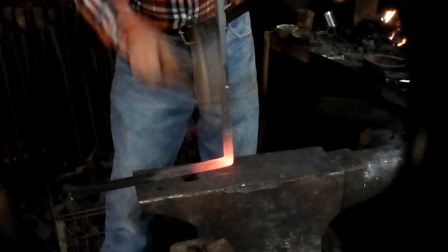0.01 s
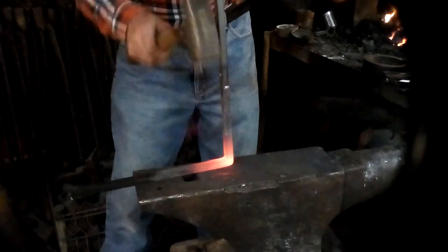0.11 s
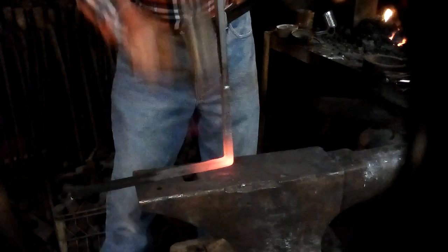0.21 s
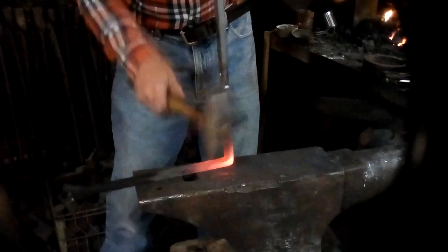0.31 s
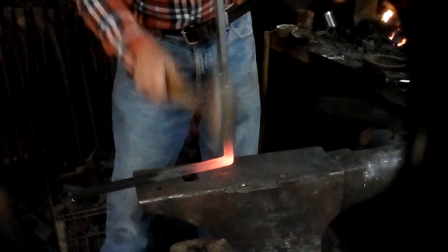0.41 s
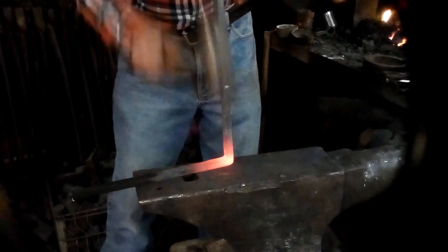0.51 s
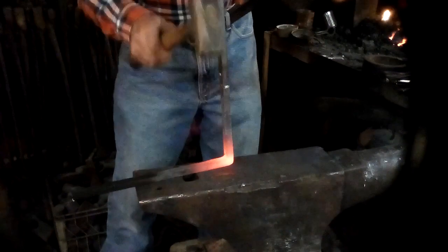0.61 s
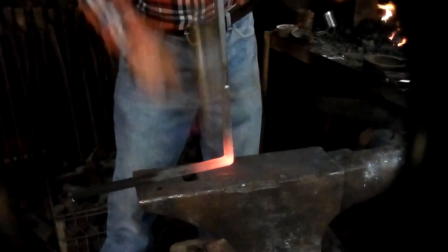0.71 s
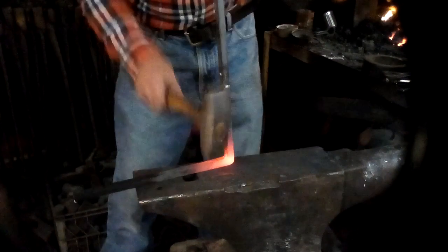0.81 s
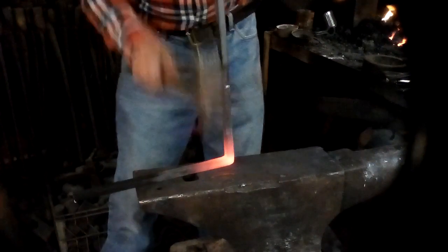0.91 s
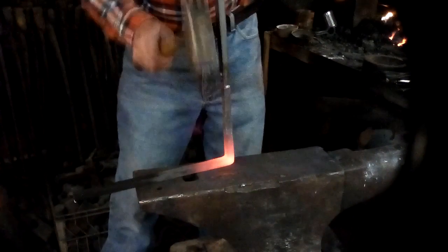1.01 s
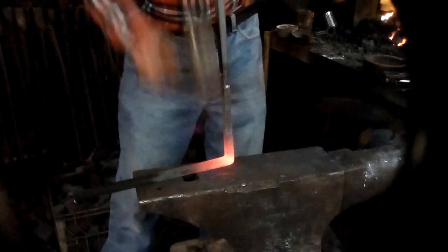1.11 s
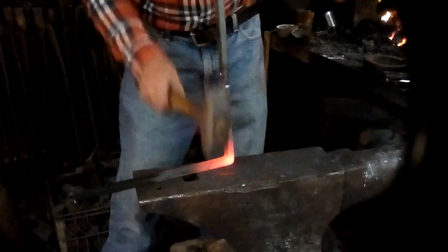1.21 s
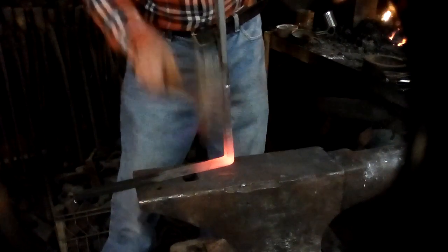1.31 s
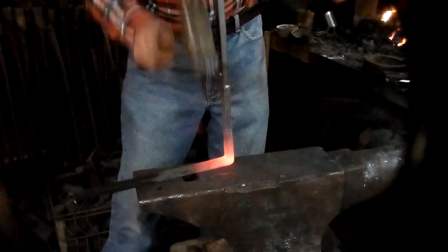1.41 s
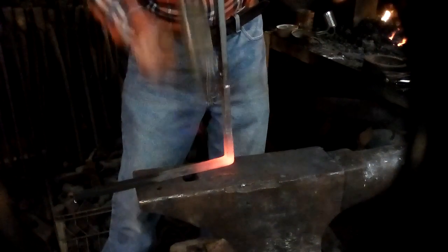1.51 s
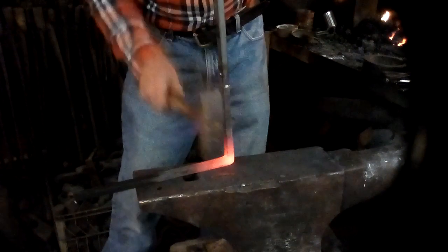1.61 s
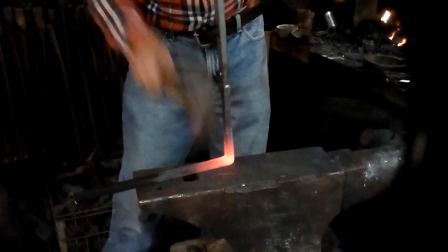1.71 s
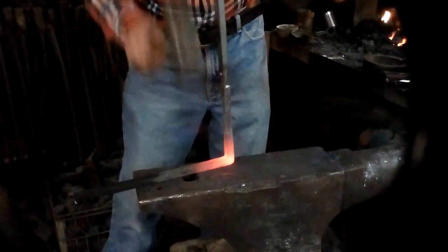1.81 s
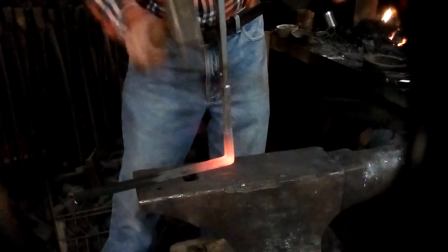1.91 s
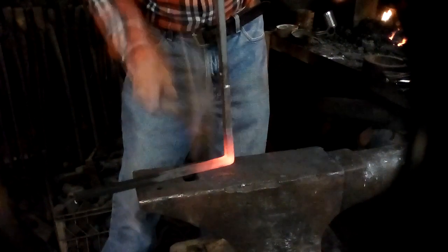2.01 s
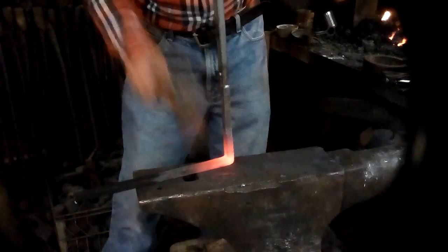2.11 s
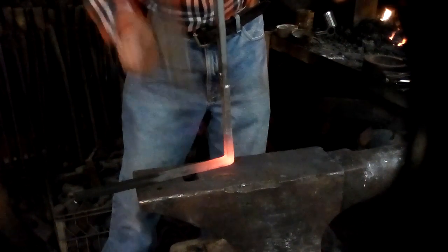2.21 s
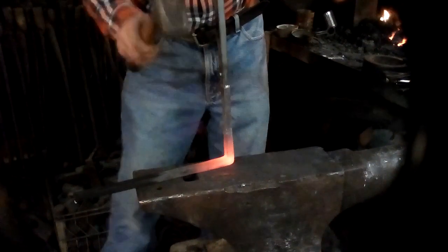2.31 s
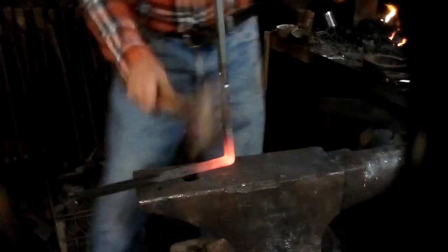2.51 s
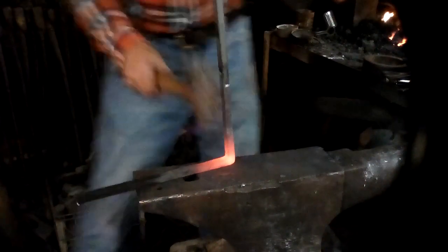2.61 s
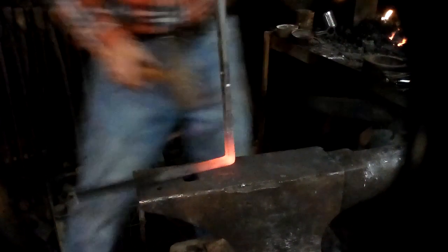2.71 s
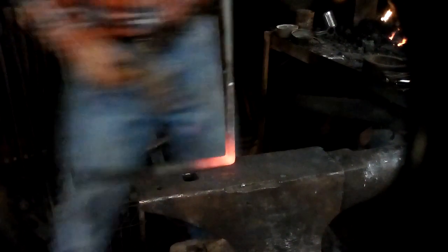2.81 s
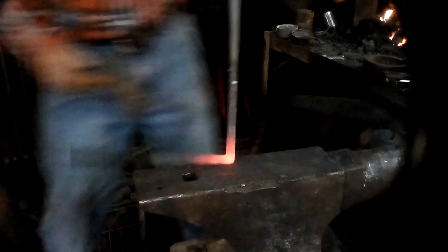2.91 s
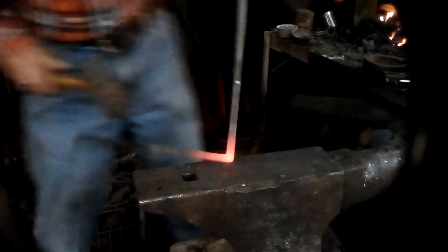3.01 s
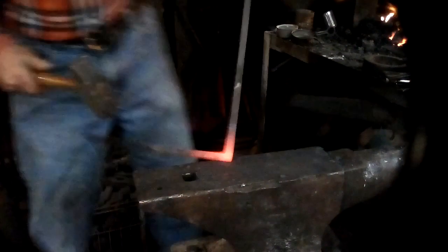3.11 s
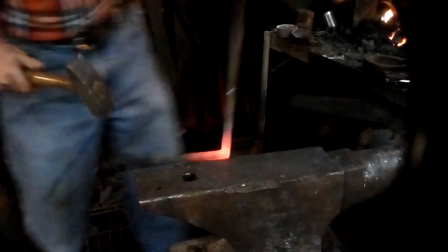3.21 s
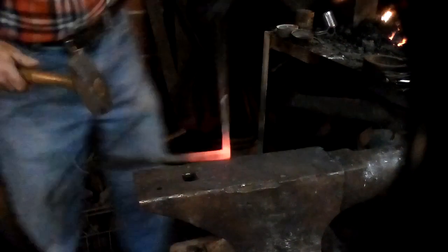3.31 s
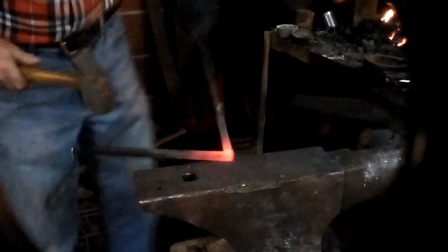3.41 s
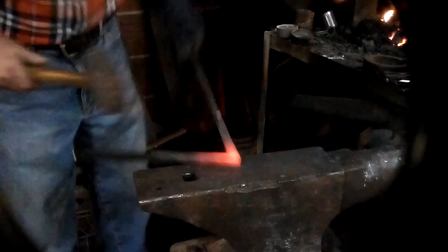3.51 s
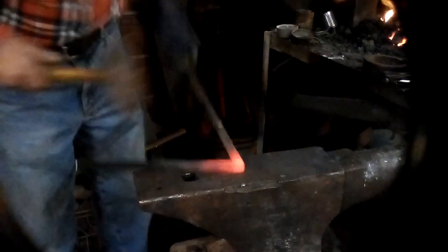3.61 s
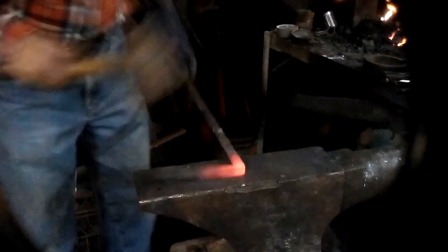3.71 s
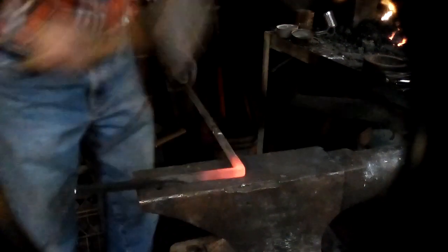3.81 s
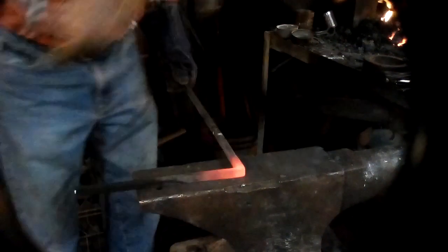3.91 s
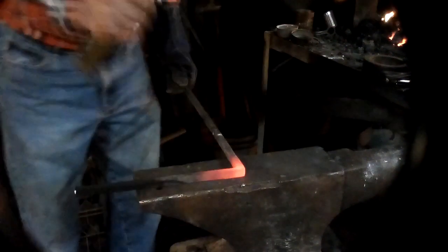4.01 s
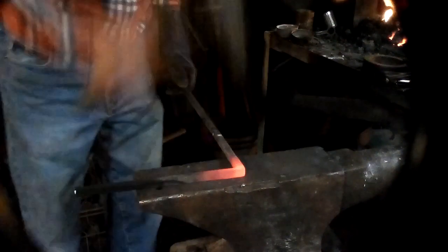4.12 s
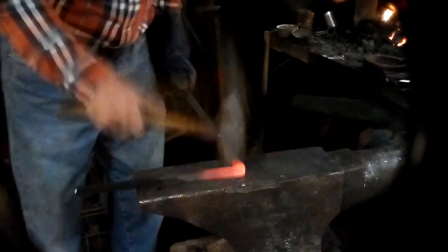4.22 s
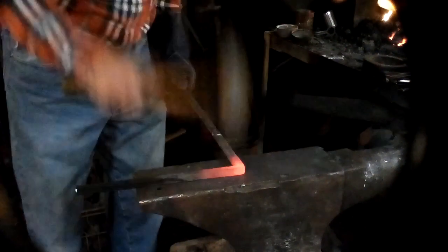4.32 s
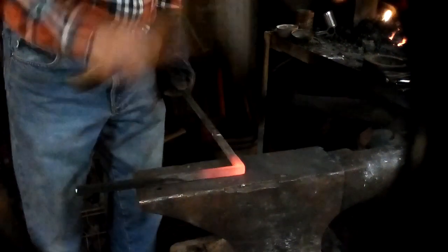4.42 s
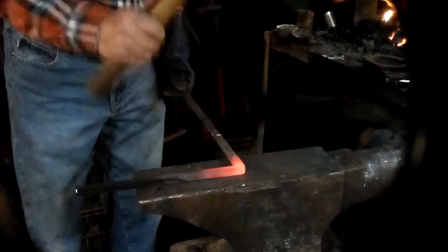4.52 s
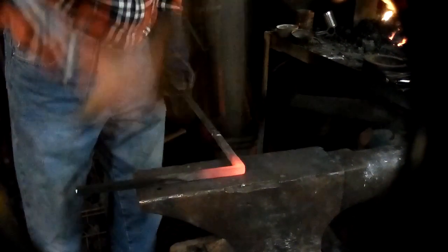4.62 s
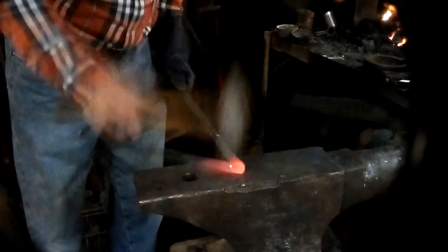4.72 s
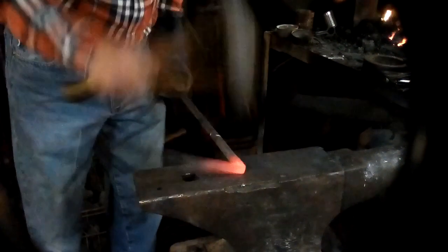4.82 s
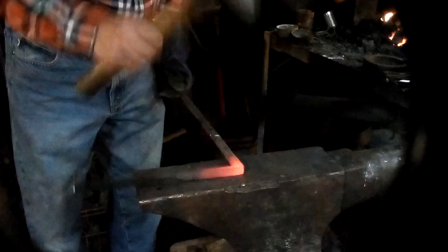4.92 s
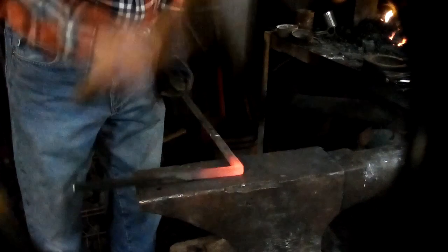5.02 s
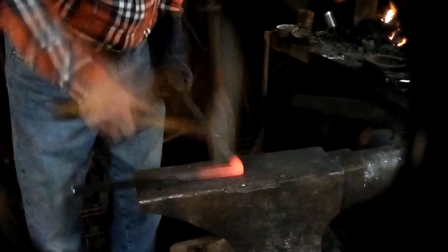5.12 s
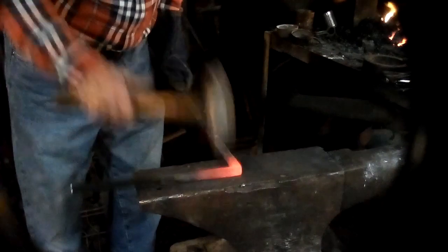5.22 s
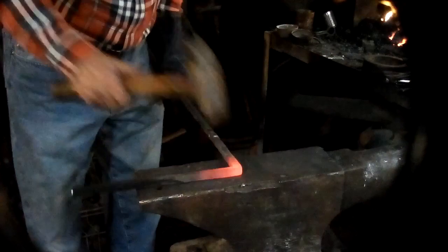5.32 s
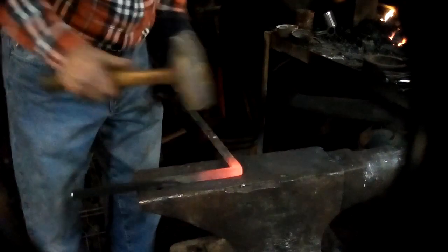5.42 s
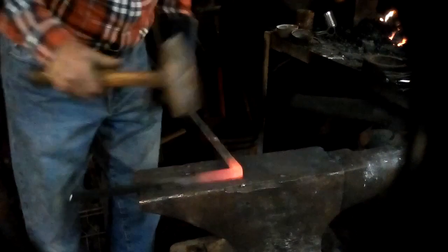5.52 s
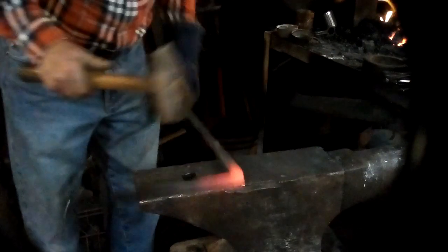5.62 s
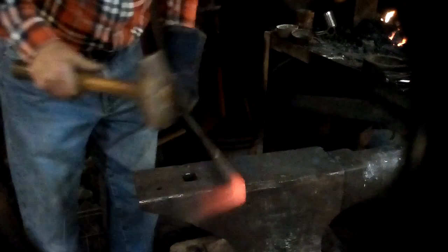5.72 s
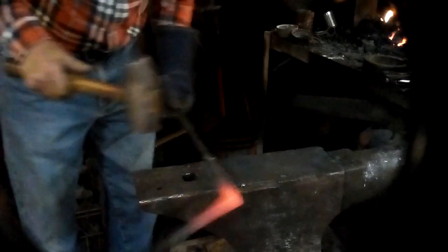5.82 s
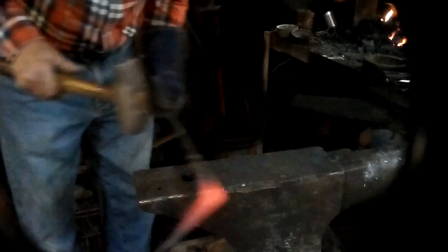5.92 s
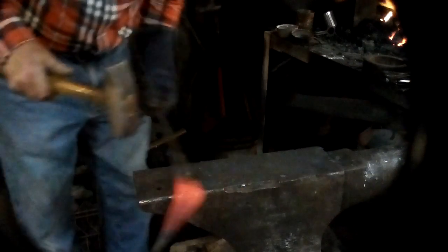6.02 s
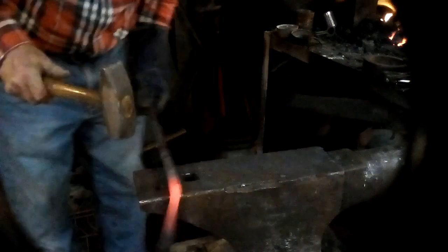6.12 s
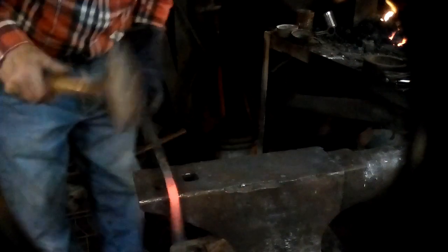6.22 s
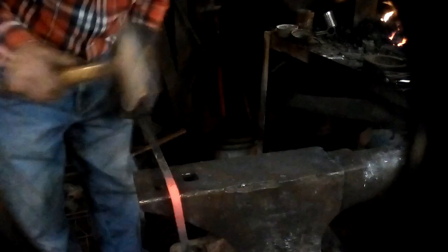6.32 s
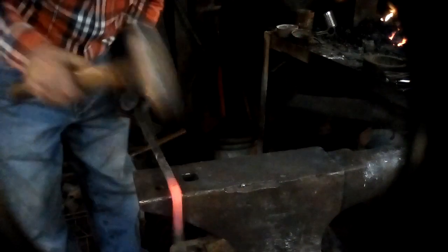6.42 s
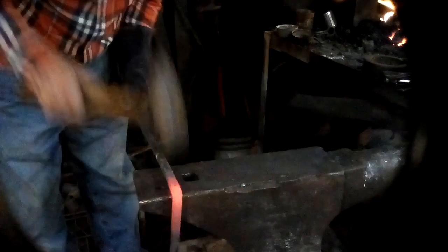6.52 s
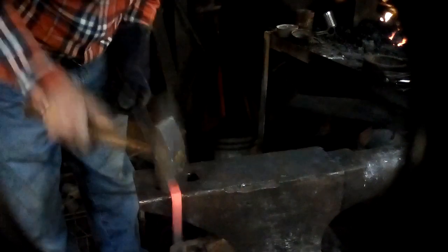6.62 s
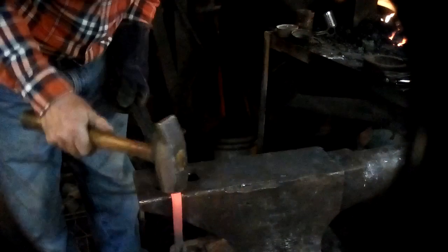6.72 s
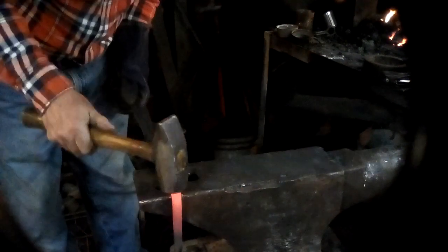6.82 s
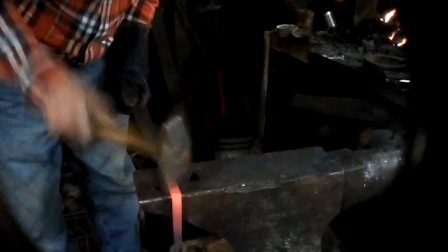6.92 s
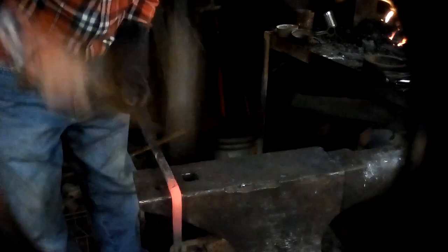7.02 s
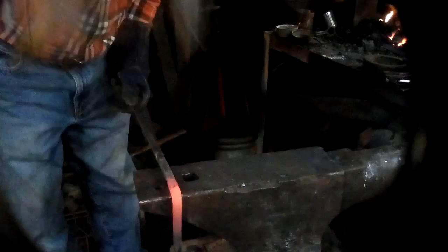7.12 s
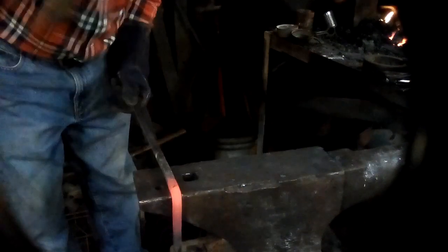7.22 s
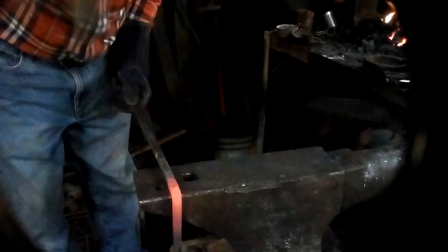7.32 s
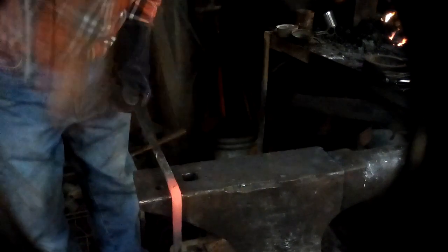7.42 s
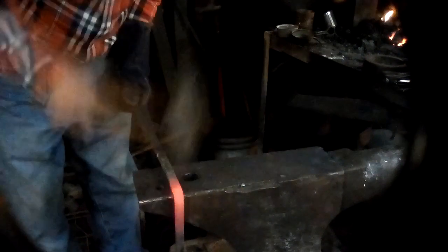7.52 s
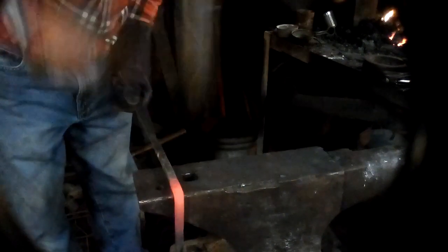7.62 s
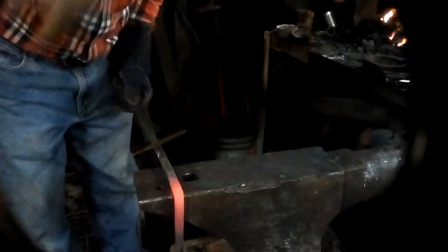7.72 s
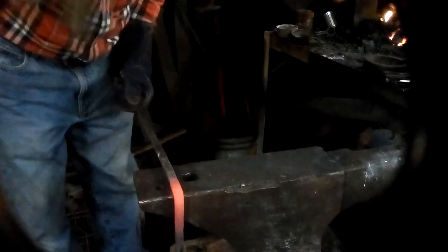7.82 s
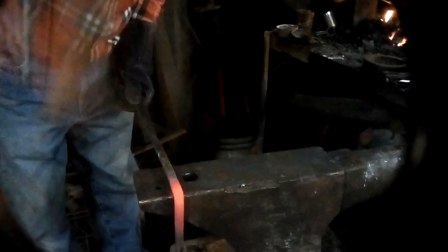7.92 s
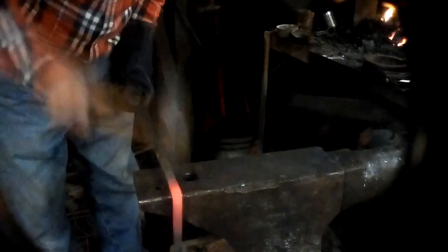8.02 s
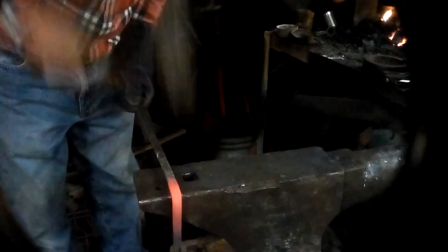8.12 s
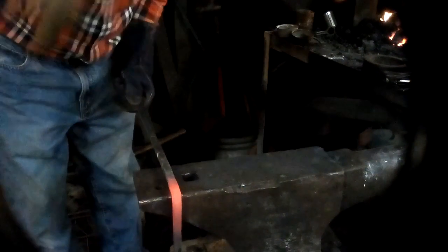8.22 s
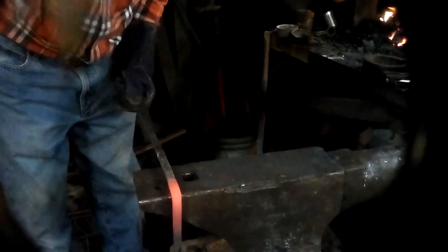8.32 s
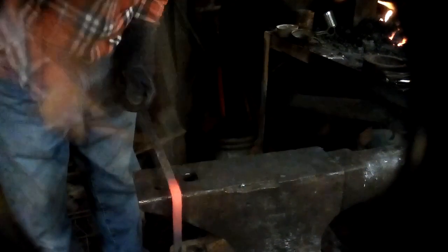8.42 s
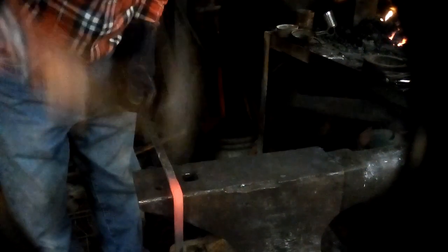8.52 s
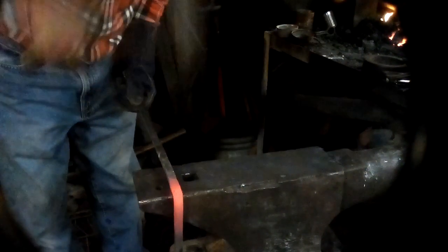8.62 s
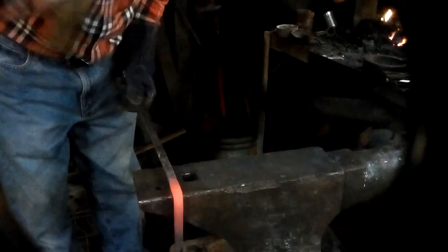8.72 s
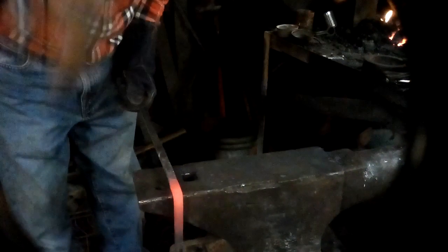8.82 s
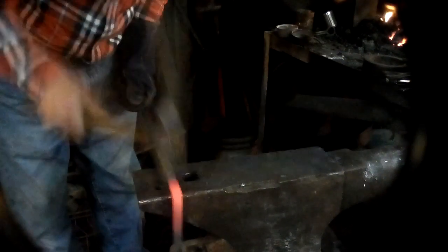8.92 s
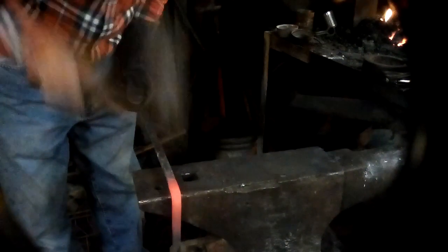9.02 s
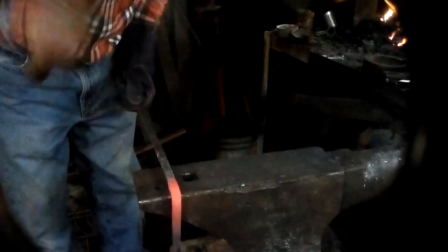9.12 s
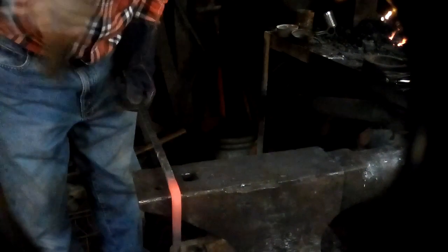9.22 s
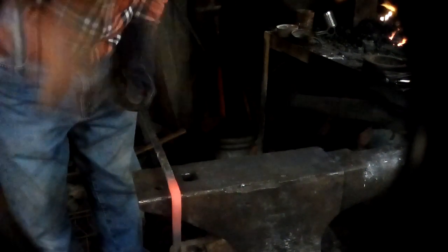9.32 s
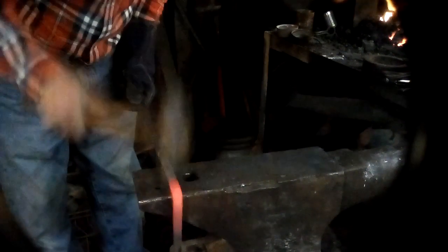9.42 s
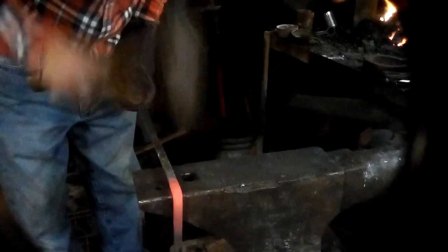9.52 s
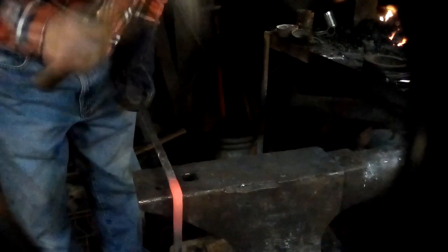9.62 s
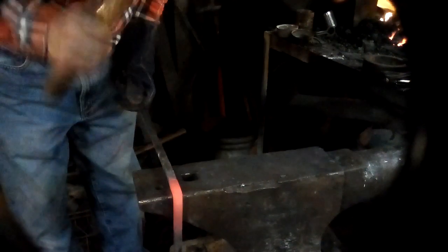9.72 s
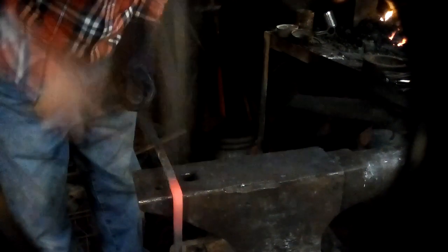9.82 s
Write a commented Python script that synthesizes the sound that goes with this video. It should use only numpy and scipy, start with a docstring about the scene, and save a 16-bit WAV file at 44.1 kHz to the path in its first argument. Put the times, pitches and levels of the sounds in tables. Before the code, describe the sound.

A hand hammer strikes a steel bar on an anvil in a hard-walled forge, over the faint, steady rumble and hiss of a fire. From 0.4 to 2.6 seconds come six evenly spaced blows, each a bright clang with a short ring and low thud, with a few light taps among them. Boots shift softly just after 3 seconds, then the bar scrapes briefly and knocks down at about 3.8. Three more ringing blows fall at 4.3, 4.8 and 5.2. Another short scrape and a footstep follow near 5.7, a few small knocks around 6.1 as the bar is turned, and one lighter blow at 6.7. From 7.6 to 9.5 seconds, five heavy blows land about half a second apart, each followed by a small, dull, ringing rebound. The room's echo swells briefly behind every strike, and the heaviest ones distort slightly.

```python
"""Over the low rumble of a fire, a smith strikes a glowing bar on an anvil: six blows into its bent corner.
Boots shift, the bar is dragged, and three blows fall on its flat. It is turned over with a few knocks and
takes a lighter blow on its edge. Last come five heavy blows on its end, each followed by a small rebound.
Every impact excites the modes of anvil and bar, which clang into a hard-walled forge. A limiter ducks
each blow, so that the room swells up behind it; the heaviest blows overload."""
import sys
import numpy as np
from scipy import signal
from scipy.fft import rfft, irfft, next_fast_len
from scipy.io import wavfile
from scipy.ndimage import uniform_filter1d, minimum_filter1d

SR = 44100
rng = np.random.default_rng(int(sys.argv[2]) if len(sys.argv) > 2 else 0)


def store_pcm(level_fs):
    """Save levels as 16-bit WAV."""
    pcm = np.round(np.clip(level_fs, -1, 1) * 32767).astype(np.int16)
    wavfile.write(sys.argv[1], SR, np.atleast_2d(pcm).T)


N = 434385
T = np.arange(SR) / SR  # one second, the life of a blow

# Modes of the anvil. Each row: frequency in Hz, t60 in seconds, then energy in dB with the bar
# on its corner, flat, edge and end.
ANVIL_MODES = [(1335, 0.07, -24, -25, -27, -35), (1690, 0.07, -28, -27, -21, -25),
               (1938, 0.07, -24, -29, -21, -23), (2110, 0.07, -25, -27, -22, -31),
               (2369, 0.07, -22, -26, -24, -17), (2627, 0.07, -26, -28, -22, -16),
               (2907, 0.09, -16, -22, -16, -20), (3424, 0.09, -19, -24, -18, -17),
               (3628, 0.09, -23, -23, -19, -24), (3758, 0.09, -23, -26, -14, -26),
               (3994, 0.09, -30, -23, -28, -25), (4265, 0.07, -17, -17, -12, -19),
               (4597, 0.09, -19, -20, -22, -22), (4931, 0.09, -16, -20, -23, -23),
               (5297, 0.09, -31, -28, -27, -24), (5652, 0.09, -21, -17, -20, -17),
               (5986, 0.09, -19, -14, -25, -28), (6137, 0.09, -21, -21, -28, -28),
               (6471, 0.09, -27, -23, -27, -31), (6621, 0.09, -21, -22, -24, -23),
               (6977, 0.09, -29, -27, -34, -32), (7300, 0.09, -24, -21, -34, -23),
               (7569, 0.09, -27, -21, -20, -30), (7903, 0.09, -24, -25, -30, -26),
               (8258, 0.09, -29, -23, -23, -31), (8484, 0.09, -26, -22, -32, -29),
               (8926, 0.09, -23, -20, -32, -26), (9636, 0.09, -26, -29, -35, -28),
               (12715, 0.09, -34, -25, -30, -32), (14729, 0.09, -37, -31, -41, -30)]


def amp(db):
    """Amplitude ratio of a level in decibels."""
    return 10 ** (np.asarray(db) / 20)


def read(points, hz):
    """Interpolation of a table on a logarithmic frequency axis."""
    f, value = np.transpose(points)
    return np.interp(np.log(hz + 1), np.log(f + 1), value)


def colour(x, points):
    """Minimum-phase filter through (Hz, dB) points: folding the cepstrum makes it causal."""
    size = 2 * next_fast_len(len(x))
    gain = amp(read(points, np.fft.rfftfreq(size, 1 / SR)))
    cepstrum = irfft(np.log(gain))
    cepstrum[1:size // 2] *= 2
    cepstrum[size // 2 + 1:] = 0
    return irfft(rfft(x, size) * np.exp(rfft(cepstrum)))[:len(x)]


def unit(x):
    """Normalisation to an energy of one."""
    return x / np.linalg.norm(x)


def fade(t, t60):
    """Exponential decay, 60 dB in t60 seconds."""
    return np.exp(-np.log(1000) * t / t60)


def add(mix, start, sound):
    """Superposition of a sound on the mix, from start seconds on."""
    part = mix[round(start * SR):][:len(sound)]
    part += sound[:len(part)]


def burst(t60, crack=0, crack_t60=0.029):
    """Decaying noise of even spectrum and unit energy; crack adds a sharp front."""
    t = T[:SR // 3]
    decay = fade(t, t60) + crack * fade(t, crack_t60)
    puff = rng.standard_normal(len(t)) * decay
    for _ in range(4):  # level the spectrum, then restore the decay
        puff = irfft(np.exp(1j * np.angle(rfft(puff))), len(t))
        puff = puff * decay / np.sqrt(abs(uniform_filter1d(puff ** 2, 96)) + 1e-14)
    return np.pad(unit(puff), (0, len(T) - len(t)))


def fire(rms_db=-59.5):
    """Stationary noise: the low rumble of the fire under a faint hiss."""
    # Each row: frequency in Hz, relative spectral density in dB.
    spectrum = [(20, -24), (50, -21), (80, 4.5), (150, 3), (280, 1.5), (450, -4), (1000, -10),
                (2500, -13.5), (6000, -13.5), (9000, -22.5), (13000, -20.5), (15500, -15)]
    return amp(rms_db) * np.sqrt(N) * unit(colour(rng.standard_normal(N), spectrum))


def forge(x, wet_db=-2.5, build_s=0.002, near_db=-10, near_t60=0.11):
    """Reverberation: floor and benches reflect at once; wall echoes build up and die band by band."""
    # Each row: frequency in Hz, reverberation time in seconds.
    decay_times = [(80, 0.73), (250, 0.56), (700, 0.56), (2500, 0.5), (5000, 0.42), (8000, .4),
                   (15000, 0.22)]
    hz, t, bands = signal.stft(rng.standard_normal(len(T)), SR, nperseg=256)
    bands = bands * fade(t, read(decay_times, hz)[:, None])
    tail = signal.istft(bands, SR, nperseg=256)[1][:len(T)]
    walls = amp(wet_db) * unit(tail * (1 - np.exp(-T / build_s)))
    near = amp(near_db) * burst(near_t60)
    return x + signal.fftconvolve(x, walls + near)[:len(x)]


def step(db, t60=0.12):
    """A soft impact, boot on floor, puts its energy into the low frequencies."""
    spectrum = [(40, -6), (120, 2), (300, 8), (500, -15), (1500, -16), (6000, -24)]
    return amp(db) * colour(burst(t60), spectrum)


def ring(modes, pose):
    """Free vibration is a sum of damped sinusoids; each contact shifts their levels by about a decibel."""
    # How the bar lies, in the order of the energy columns: corner, flat, edge, end.
    poses = ["corner", "flat", "edge", "end"]
    table, t = np.array(modes, float), T[:SR // 2]
    hz, t60, db = table[:, :1], table[:, 1:2], table[:, 2 + poses.index(pose), None]
    scatter_db = rng.standard_normal((len(table), 1))
    sign = np.sign(np.cos(hz * rng.uniform(.008, .016)))  # close pairs tend to start in step, then beat
    peak = sign * amp(db + scatter_db) * 2 * np.sqrt(np.log(1000) / t60 / SR)
    waves = np.sin(2 * np.pi * hz * t) * fade(t, t60)
    return np.pad((peak * waves).sum(0), (0, len(T) - len(t)))


def drag(length, db, ringing, soft=0.21):
    """Stick-slip friction: the bar's rough scale catches and slips, exciting the anvil's modes."""
    envelope = np.interp(T, [0, soft * length / 2, length * (1 - soft), length], [0, 1, 1, 0])
    slips = rng.standard_normal(len(T)) * envelope
    anvil = signal.fftconvolve(slips, ring(ANVIL_MODES, "edge"))[:len(T)]
    spectrum = [(70, -9.5), (170, 10), (300, 2.5), (900, -2), (1900, -1), (3500, -5.5), (6000, -9),
                (9000, -26)]
    return amp(db) * colour(slips + ringing * anvil, spectrum)


def low_thud(pose, lag_s=.008):
    """Inertia delays the heavy anvil's downward push; low resonances boom under each blow."""
    # Each row: frequency in Hz, spectral density in dB.
    push_spectrum = [(25, -17), (48, -31), (82, -7), (105, -3.5), (175, 8), (240, 6.5), (330, 6),
                     (520, 0.5), (900, -11), (2500, -23.5)]
    # Low resonances. The columns are those of ANVIL_MODES.
    low_modes = [(169.4, 0.26, -19.5, -22.5, -27, -15), (262, 0.21, -30, -39, -14, -26.5),
                 (304.2, 0.14, -24.5, -33, -21, -31), (549, 0.025, -25, -24, -16.5, -15),
                 (846, 0.021, -23, -15.5, -16, -21)]
    push = colour(signal.unit_impulse(len(T), round(lag_s * SR)), push_spectrum)
    return push + ring(low_modes, pose)


def impact(pose, db, clatter_t60, thud_db, bright_db, anvil_db, bar_db, tick_db, clatter_db=1.5):
    """Impulsive excitation: the bar cracks and clatters, the hard hammer face ticks, the steel rings."""
    # Each row of both: frequency in Hz, spectral density in dB.
    clatter_spectrum = [(200, -25), (500, -5), (850, -1), (1300, -8), (1950, 0.5), (3000, -3), (4200, -2),
                        (6300, -7), (8000, -16.5), (11000, -11.5), (15500, -27)]
    tick_spectrum = [(6000, -34), (10000, -13.5), (12200, -4), (13700, -12), (15300, 4.5)]
    # Modes of bar and hammer head. The columns are those of ANVIL_MODES.
    bar_modes = [(1830, 0.14, -25, -27, -24, -19), (1863, 0.1, -26, -26, -24, -23),
                 (2590, 0.1, -28, -27, -24, -15), (2614, 0.4, -35, -31, -29, -15),
                 (2650, 0.1, -26, -28, -25, -18), (2704, 0.27, -29, -11, -27, -21),
                 (3499, 0.1, -22, -26, -24, -20), (4596, 0.3, -18, -22, -24, -10),
                 (4605, 0.3, -22, -28, -30, -13), (5200, 0.1, -36, -34, -36, -20),
                 (5824, 0.25, -42, -37, -42, -20), (9410, 0.12, -26, -26, -44, -40),
                 (10530, 0.1, -32, -33, -46, -27), (11470, 0.08, -24, -31, -47, -30),
                 (13738, 0.08, -39, -39, -45, -36), (15461, 0.1, -38, -29, -38, -43),
                 (15622, 0.1, -37, -39, -49, -38)]
    clatter = amp(clatter_db) * colour(burst(clatter_t60, crack=0.97), clatter_spectrum)
    tick = amp(tick_db) * colour(burst(t60=.016), tick_spectrum)
    thud = amp(thud_db) * low_thud(pose)
    steel = amp(anvil_db) * ring(ANVIL_MODES, pose) + amp(bar_db) * ring(bar_modes, pose)
    # a shorter, harder contact puts more into the treble
    tilt = [(2500, 0.017), (6000, bright_db), (14000, 2.8 * bright_db)]
    return amp(db) * colour(clatter + tick + thud + steel, tilt)


def rebound(blow_db):
    """Elastic recoil: struck on its end, the bar springs up and drops back, dull and ringing."""
    return impact("end", blow_db - 37.5, clatter_t60=0.079, thud_db=-21, bright_db=-9,
                  anvil_db=8, bar_db=6.5, tick_db=-20, clatter_db=-2)


def strike(pose, db, bright_db, bar_db=-6.5, extra_thud_db=0, full_blow_db=27):
    """Contact damping: the lighter the blow, the more freely the anvil rings, the longer the clatter."""
    # Each row, by pose, at full_blow_db: clatter t60 in seconds, then thud, anvil ring and tick in dB.
    seating = {"corner": (0.0664, -4.5, 0.5, -5.5), "flat": (0.0054, -1.5, 0, -5),
               "edge": (.085, 3, 0, -20), "end": (0.19, -6.5, 5, -6.5)}
    clatter_t60, thud_db, anvil_db, tick_db = seating[pose]
    lighter_db = full_blow_db - db
    clatter_t60 *= 2 ** (lighter_db / 69)
    anvil_db += 0.3674 * lighter_db
    return impact(pose, db, clatter_t60, thud_db + extra_thud_db, bright_db, anvil_db, bar_db, tick_db)


def scene(rebound_s=.272):
    """Superposition: every contact reverberates through the forge and adds to the sound of the fire."""
    # Hammer blows. Each row: start in seconds, pose, then strength, brightness and bar ring in dB.
    blows = [ (0.3911, "corner", 31, 1.5, -25), (0.8511, "corner", 29.5, -2, -26),
             (1.279, "corner", 31, 2.5, -7), (1.6953, "corner", 31, 1, -7),
             (2.126, "corner", 32.5, 0.5, -10), (2.5704, "corner", 32, 4.5, -28),
             (4.2946, "flat", 31, 2, -5), (4.7666, "flat", 32, 2.5, -10.5), (5.2150, "flat", 30.5, 4, -7.5),
             (6.7121, "edge", 18.5, -4.5, -16), (7.5598, "end", 38, -1, -10), (8.0619, "end", 39, -1, -0.5),
             (8.533, "end", 39, 1, 2), (8.9998, "end", 39, 0.5, 1), (9.4790, "end", 35.5, 0, -3)]
    # The hammer grazes the bar, or the bar is set down.
    # Each row: start in seconds, pose, then strength, brightness and extra thud in dB.
    knocks = [ (0.6115, "corner", -5, -3.5, 4), (0.826, "corner", 1, 7, 4),
              (1.2652, "corner", 11, 5.5, -17), (1.6902, "corner", -0.5, 2.5, -7.5),
              (3.6751, "edge", -14.5, -12, 7), (3.8302, "flat", 8.5, 2.5, 0), (5.014, "flat", 4, -2, 3.5),
              (6.055, "edge", 0, -6, -3.5), (6.1490, "edge", 6.5, -5, 0.5),
              (6.241, "edge", -9.5, -16.5, 8.5)]
    # Each row: start and length in seconds, level in dB, gain of the anvil's ring.
    drags = [(3.475, 0.1, -38, 0.24), (5.625, 0.19, -43, 1.43)]
    # Each row: start in seconds, strength in dB.
    steps = [(3.06, -10.5), (3.219, -9), (3.338, -9), (5.728, -3), (7.291, -29)]
    mix = fire()
    for start, pose, db, bright_db, bar_db in blows:
        add(mix, start, forge(strike(pose, db, bright_db, bar_db)))
        if pose == "end":
            add(mix, start + rebound_s, forge(rebound(db)))
    for start, pose, db, bright_db, thud_db in knocks:
        add(mix, start, forge(strike(pose, db, bright_db, extra_thud_db=thud_db)))
    for start, length, db, ringing in drags:
        add(mix, start, forge(drag(length, db, ringing)))
    for start, db in steps:
        add(mix, start, forge(step(db)))
    return mix[None]


def limiter(x, ceiling_db=-5.5, deepest_db=-19, hold_s=0.042, release_s=0.066, ahead_samples=110):
    """Look-ahead limiting: the gain drops just before a peak, holds, then recovers exponentially."""
    gain = np.clip(amp(ceiling_db) / (abs(x) + 1e-9), amp(deepest_db), 1)
    window = int(hold_s * SR) + ahead_samples
    held = minimum_filter1d(gain, window, origin=window // 2 - ahead_samples)
    clock = np.arange(N) / SR / release_s
    depth = np.exp(np.maximum.accumulate(np.log(1 - held + 1e-9) + clock) - clock)
    return x * uniform_filter1d(1 - depth, ahead_samples)


def record(dry, full_scale=.74, bass_cut_hz=55, treble_cut_hz=15850):
    """Saturation: peaks that get past microphone and limiter are rounded off, then the band is limited."""
    # Each row: frequency in Hz, gain in dB.
    microphone_response = [(20, 3), (6500, 0), (8200, -13.5), (13000, -12.5), (15000, -7)]
    limited = limiter(colour(dry[0], microphone_response))
    saturated = limited / (1 + (limited / full_scale) ** 6) ** (1 / 6)
    trimmed = signal.lfilter(*signal.butter(1, bass_cut_hz, "high", fs=SR), saturated)
    low_pass = signal.firwin(301, treble_cut_hz, window=("kaiser", 9), fs=SR)
    return signal.oaconvolve(trimmed, low_pass, "same")[None]


dry = scene()
out = record(dry)
store_pcm(out)
```